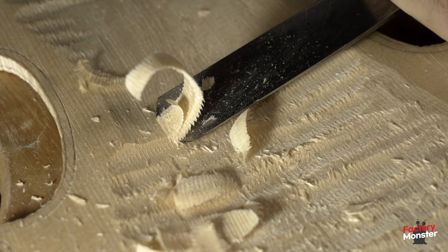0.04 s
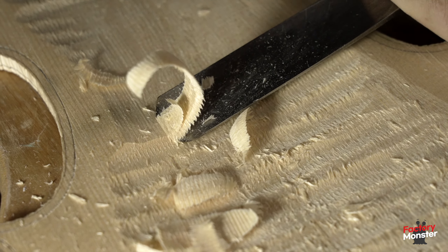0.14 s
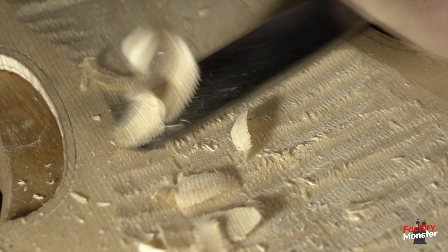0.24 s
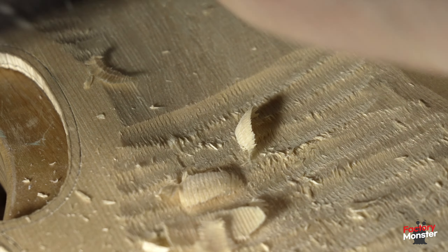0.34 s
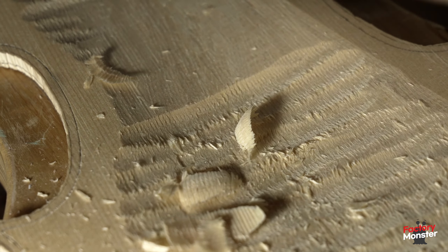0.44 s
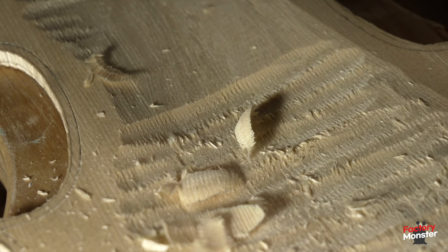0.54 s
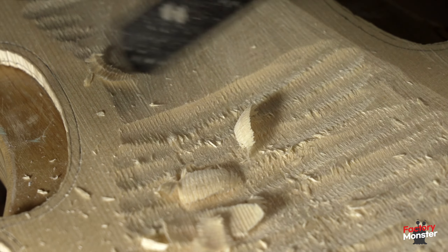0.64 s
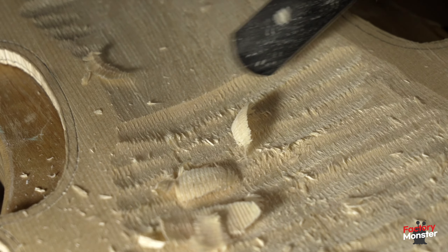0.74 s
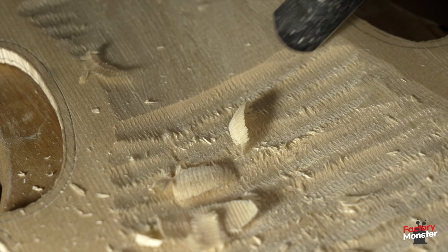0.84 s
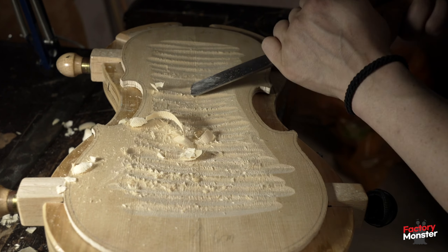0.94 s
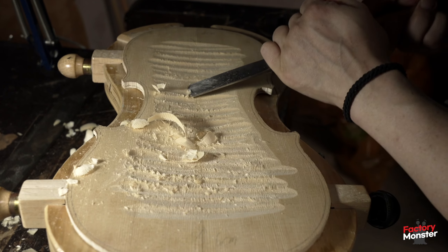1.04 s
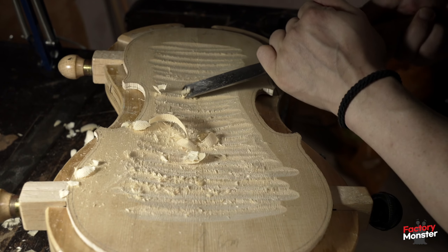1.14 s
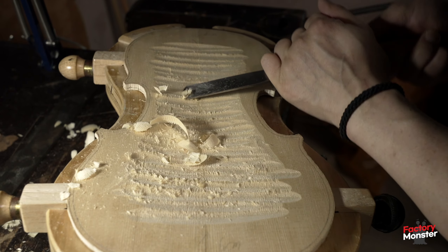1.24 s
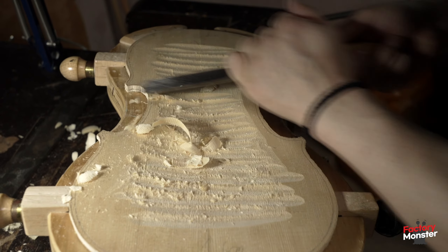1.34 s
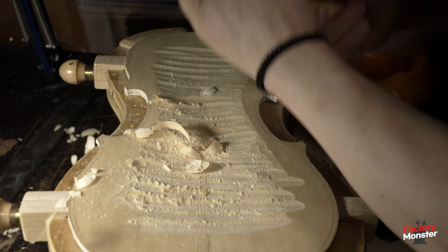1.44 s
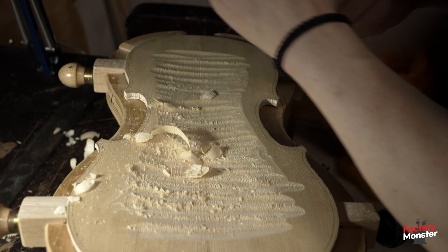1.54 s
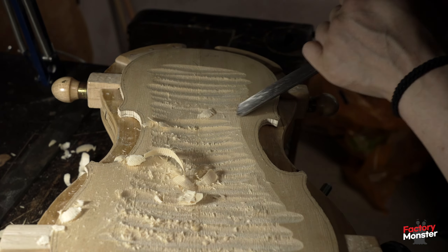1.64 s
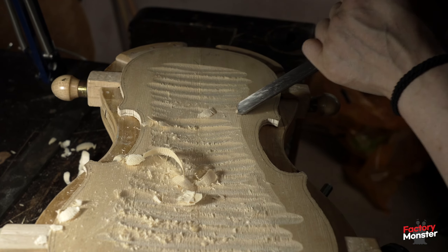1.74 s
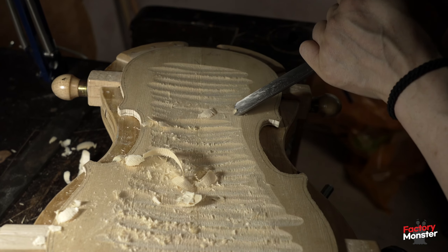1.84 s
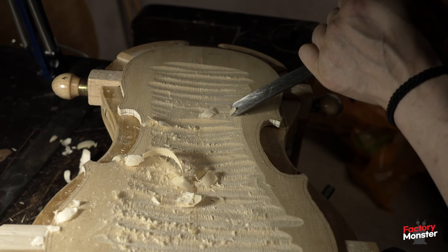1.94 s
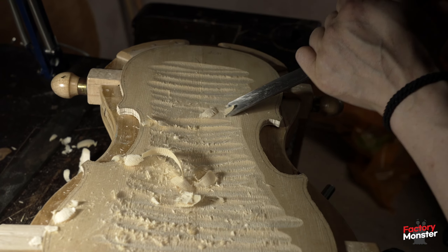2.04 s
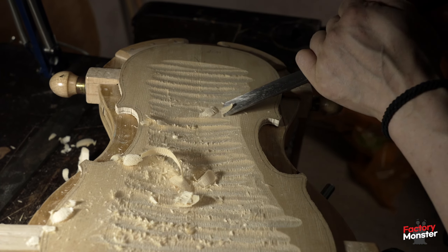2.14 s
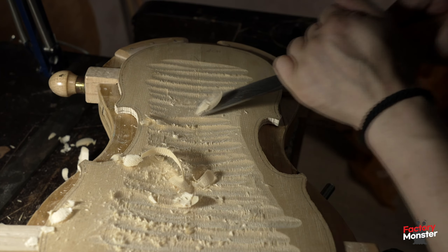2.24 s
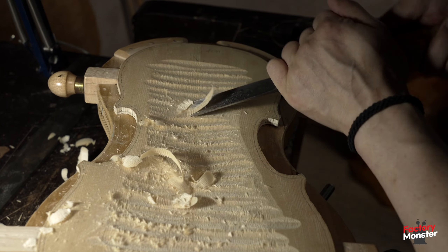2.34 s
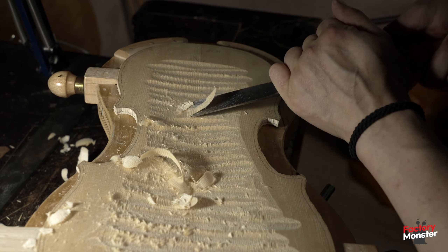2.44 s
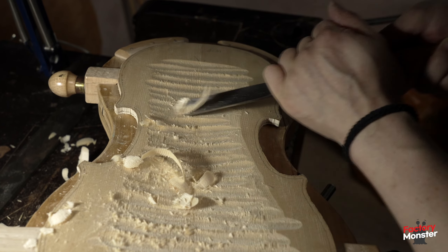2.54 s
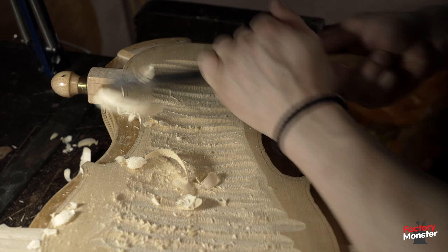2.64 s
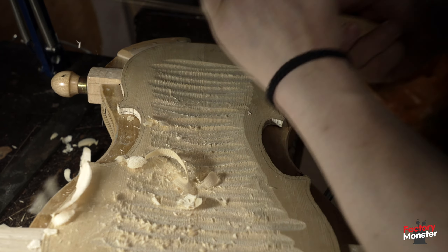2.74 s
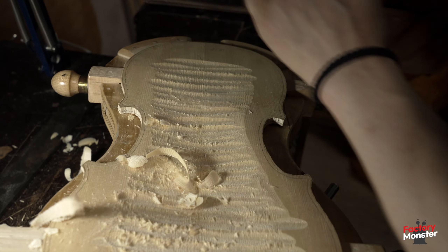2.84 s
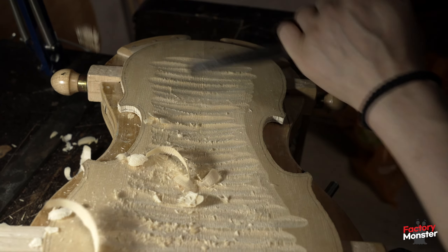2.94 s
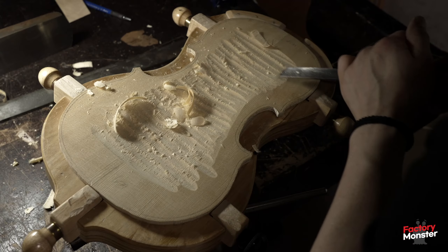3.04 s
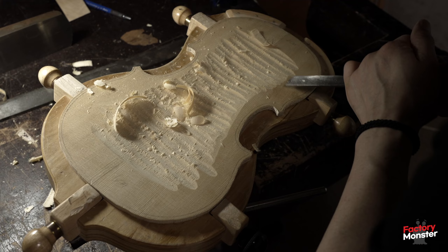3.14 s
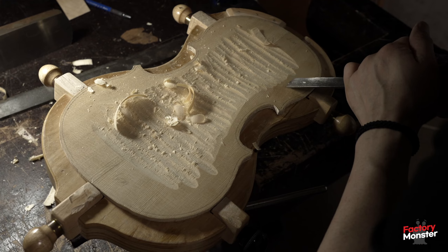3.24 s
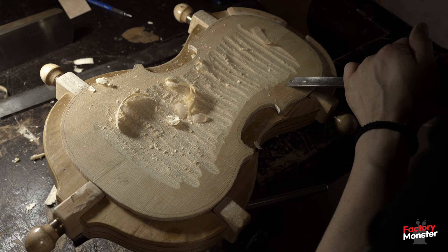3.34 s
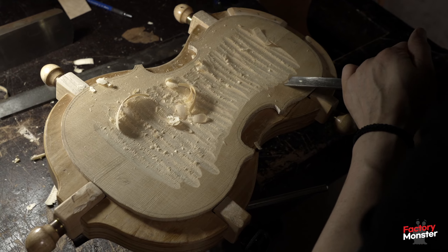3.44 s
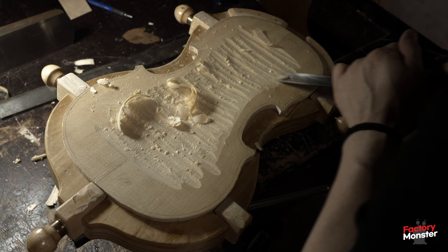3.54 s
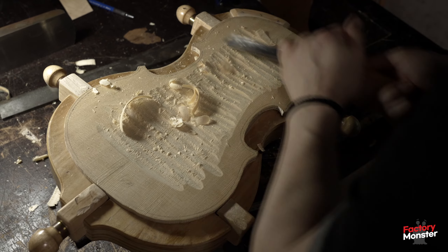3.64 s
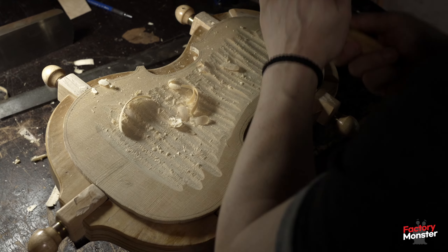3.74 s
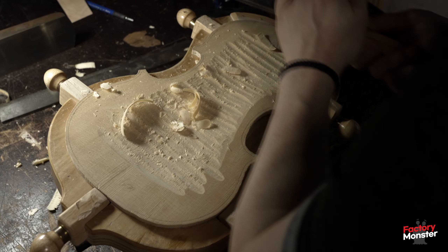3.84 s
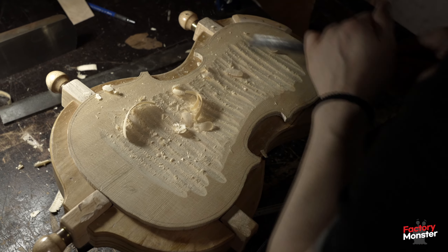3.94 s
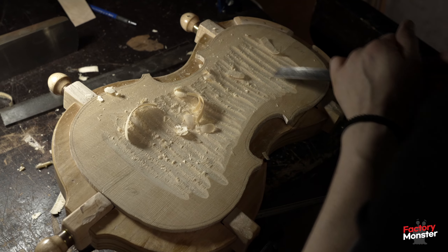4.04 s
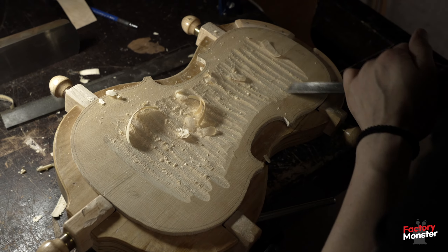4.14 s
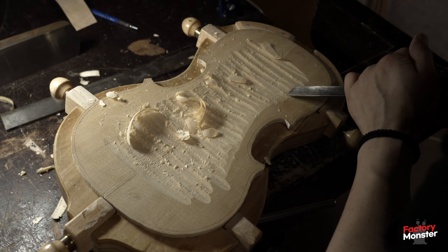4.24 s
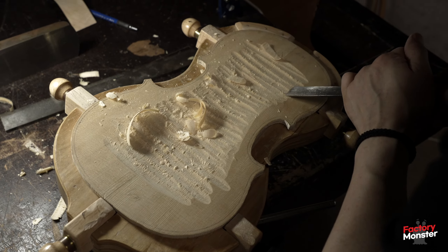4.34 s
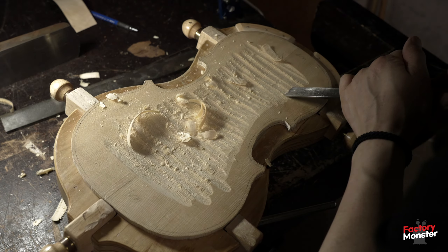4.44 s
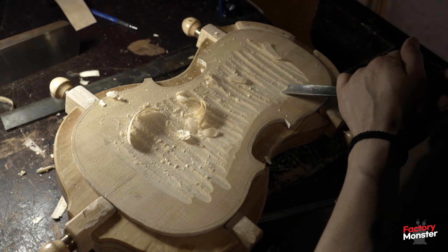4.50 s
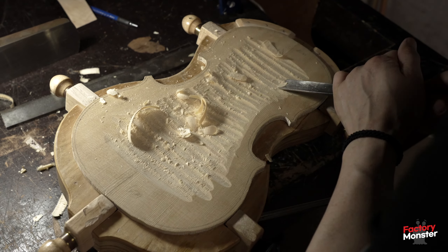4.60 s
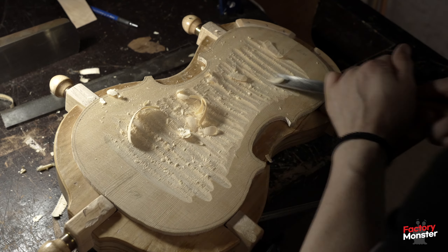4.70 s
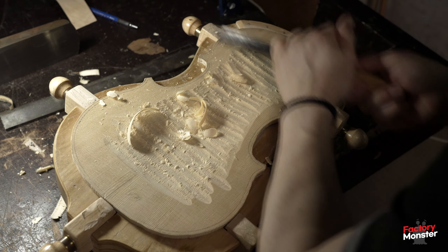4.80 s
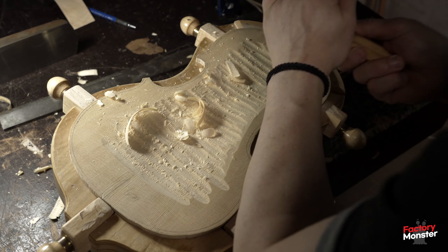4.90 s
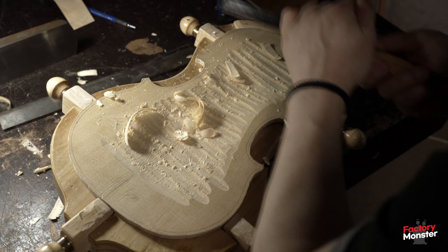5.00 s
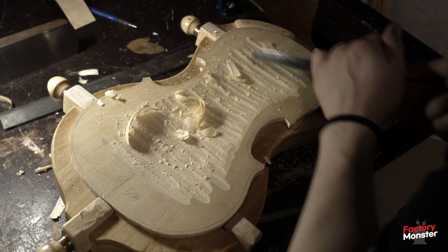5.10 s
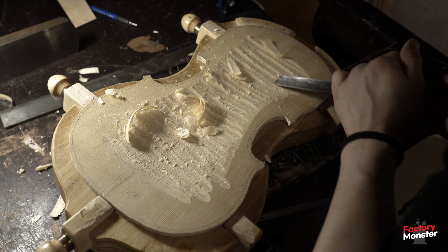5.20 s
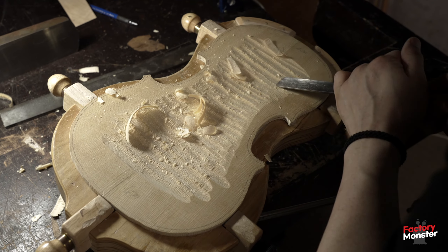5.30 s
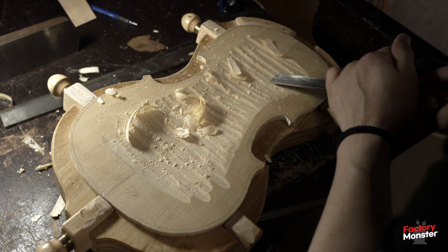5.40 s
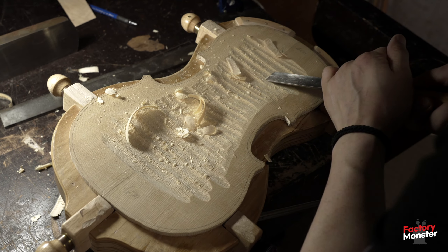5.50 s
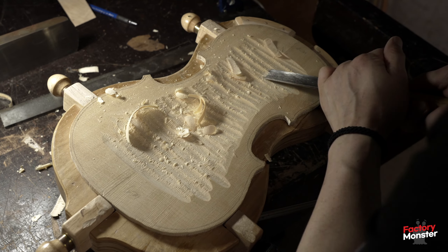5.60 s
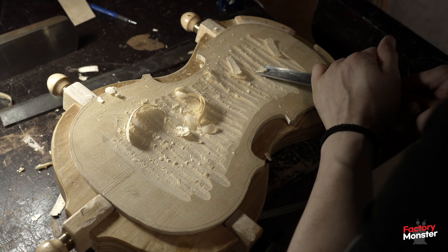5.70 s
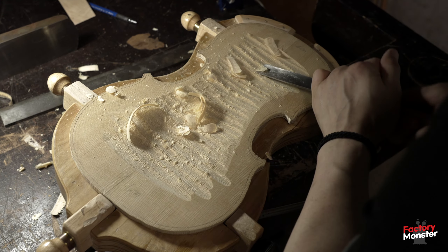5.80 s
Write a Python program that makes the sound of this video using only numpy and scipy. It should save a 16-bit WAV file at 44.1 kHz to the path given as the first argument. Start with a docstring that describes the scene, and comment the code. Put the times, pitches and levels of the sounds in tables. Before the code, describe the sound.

A hand gouge scrapes and cracks through hard wood up close, dense rasping strokes giving way to short separate cuts, in a small workshop.

```python
"""In a small workshop, a hand gouge carves a clamped maple plate on a bench, close to the microphone.
The edge sticks, cracks free and tears fibres: noise and short bursts excite resonances of plate, blade and fibres.
Steel knocks ring the same plate modes as decaying sines; the bench booms under the push as narrow-band noise.
Somebody further off taps metal, and faint squeaks glide in pitch; dense reflections of the room answer
over a quiet floor of rumble and air noise."""
import sys
import numpy as np
from scipy import signal
from scipy.fft import rfft, irfft
from scipy.io import wavfile
from scipy.ndimage import uniform_filter1d

SR = 44100
rng = np.random.default_rng(int(sys.argv[2]) if len(sys.argv) > 2 else 0)


def makeup_ratio(level_db):
    """Linear amplitude ratio for a level in decibels (20 dB per factor of ten)."""
    decades = np.asarray(level_db, float) / 20
    return 10 ** decades


def master(y):
    """Save y as 16-bit WAV."""
    cut = np.clip(np.atleast_2d(y).T, -1, 1)
    pcm = np.round(cut * 32767)  # scale
    wavfile.write(sys.argv[1], SR, pcm.astype(np.int16))


N = 258426
T = np.arange(N) / SR

# far machines, relative spectrum: pitch_hz, density_db (per Hz)
RUMBLE_SPECTRUM = [(13, -27), (22, -2.5), (39, 2.5), (65, -13), (97, -22), (188, -10), (258, -9.5),
                   (400, -28.5), (520, -54), (880, -120)]
# quiet air, relative spectrum: pitch_hz, density_db (per Hz)
AIR_SPECTRUM = [(220, -30), (380, -4), (511, -10), (677, -6.5), (743, -13.5), (842, -12.5), (1730, -19.5),
                (1870, -22), (2630, -23.5), (3540, -23.5), (5640, -34), (15800, -48.5)]
# course of the air noise, about which it wanders: time_s, level_db
AIR_LEVEL = [(0, -48), (.45, -46.5), (.8, -49.5), (1.0, -58), (3.0, -59.5), (5.86, -58.5)]
# reverberation in bands: centre_hz, decay_60db_s, level_db
ROOM_BANDS = [(277.8, 0.38, -22.5), (1074, 0.42, -28.5), (2940, 0.18, -14), (7000, 0.36, -21.5),
              (13000, 0.1, -21.5)]
# modes of the bench top: pitch_hz, width_hz
BENCH_MODES = [(77, 9.9), (150, 26)]
# the bench is leaned on: strongest_s, first_mode_db, second_mode_db
PUSHES = [(.01, -28, -46), (.14, -32, -38.5), (.3, -23, -43), (.41, -31, -53), (.82, -50, -34.5),
          (1.16, -28, -46), (1.33, -36.5, -52), (1.9, -46.5, -46), (2.1, -31, -41), (2.24, -41, -31),
          (2.43, -41, -46.5), (2.6, -36.5, -37), (3.23, -64, -47.5), (3.459, -45, -44), (3.57, -41, -33.5),
          (3.69, -47, -50), (4.21, -59, -46.5), (4.57, -41.5, -41.5), (4.78, -40, -39.5), (5.259, -64, -47),
          (5.47, -37.5, -39), (5.73, -31, -40.5), (5.83, -34, -48)]
# distant metal taps: start_s, peak_db, lower_modes_db (relative)
TAPS = [(0.523, -38.5, -15), (0.663, -32.5, -13.5), (1.596, -44.5, -7.5), (2.8747, -55, -12),
        (3.017, -54, -11.5), (3.8271, -48.5, -7), (3.9705, -39.5, -14.5), (4.109, -40.5, -20),
        (4.995, -46.5, -7), (5.1347, -39, -16.5), (5.264, -46, -18)]
# modes of the tapped metal: pitch_hz, level_db (relative), decay_60db_s
METAL_MODES = [(4270, 7.5, 0.028), (4350, -6, .1), (4600, 11, .04), (4840, -9, .07), (5040, -18.5, .03),
               (3600, 12.5, 0.11), (3930, 9.5, .14)]
# thin squeaks that glide up and down again: highest_s, half_length_s, top_hz, drop_hz, level_db
SQUEAKS = [(.42, .1, 15600, 4500, -72), (.43, .06, 14200, 900, -76), (4.147, .045, 10900, 800, -76),
           (4.147, .03, 10300, 300, -82), (4.147, .02, 13950, 250, -80)]
# modes of four regions, low plate, plate, blade and fibres: pitch_hz, width_hz, level_db (relative)
LOW_MODES = [(185, 25, -6), (255.2, 7.9, -7), (297, 26, -8.5), (325.6, 18, -3), (386, 58, -3)]
PLATE_MODES = [(632.5, 26, 3), (824.5, 11, -28), (922, 40, 11), (996, 10, 6), (1020, 98, 7), (1135, 28, -8),
               (1165, 71, 0), (1250, 110, -7.5), (1503, 14, -5), (1411, 29, -1), (1534, 97, 3.5),
               (1870, 220, -3.5), (2095, 220, -4.5)]
BLADE_MODES = [(2540, 200, -11), (3214, 72, -1.5), (3620, 300, 10.5), (3604, 480, 8.5), (3830, 57, -9),
               (3980, 79, -3.5), (4800, 160, -16)]
FIBRE_MODES = [(5483, 200, -2.5), (6044, 350, -1), (6594, 350, 6), (7900, 600, 3), (8280, 470, -1),
               (9510, 740, 1), (10480, 530, -2.5), (11520, 450, -3.5), (13200, 1500, -4),
               (15040, 990, -5.5)]
# broad hump under the modes, a row for each region: pitch_hz, width_hz, level_db (relative)
HUMPS = [(310, 530, -17), (1410, 580, -21), (3860, 950, -28), (9500, 9900, -12)]
# pitch above which each region no longer follows the edge: low_hz, plate_hz, blade_hz, fibre_hz
REACH_HZ = [900, 3200, 6500, 18000]
# steel set down on the plate:
# start_s, plate_peak_db, favoured_hz, low_db (relative), free_ringing_ms, pitch_spread (log ratio)
KNOCKS = [(0.152, -12.5, 944, -9, 12, 0.014), (0.807, -4.5, 1020, -14, 9, 0.037),
          (3.215, -15, 1168, -14, 8.5, 0.1), (3.346, -52, 1000, 21, 7.1, 0.1),
          (4.191, -14, 1160, -15.5, 11, 0.15), (4.328, -32, 1250, -17, 9, 0.11),
          (4.365, -49, 1000, 17, 8, 0.1), (5.248, -33, 1000, 2, 12.7, 0.07)]
# the edge cracks free: start_s, fibre_force_db, plate_db (relative)
CRACKS = [(.0816, -30, -2), (.1507, -33.5, 12), (.1915, -31, -14), (.2186, -20.5, 9), (.2336, -13, 15),
          (.5876, -35, -27), (.621, -51, -7), (.7273, -24.5, -24), (1.0087, -35, 10), (1.0276, -35.5, 14.5),
          (1.0544, -31, -2), (1.0904, -42, 12), (1.1144, -31, -2), (1.1376, -22, 2), (1.2293, -33.5, -2),
          (1.2644, -41, 7), (1.294, -26.5, -13), (1.3016, -24, 7), (1.475, -47, -21), (1.7581, -37, 2),
          (1.7898, -29, 18), (1.8627, -39, -1), (1.8881, -32.5, 14), (1.9071, -28, 12.5),
          (1.952, -27.5, 13), (1.9729, -30, 14), (2.0406, -21.5, 4), (2.059, -12.5, 11.5),
          (2.0686, -21, 6.5), (2.0774, -18, 8), (2.0946, -15.5, 8), (2.1632, -15, 4), (2.2001, -20, 7),
          (2.2171, -15.5, 2.5), (2.2314, -16, 8), (2.2374, -18, 0), (2.2434, -22, 0), (2.261, -18, 7),
          (2.3, -39, 2), (2.3966, -22.5, -9), (2.4194, -35, -20), (2.4748, -46, -20), (2.5535, -22.5, -5),
          (2.7921, -54, -5.5), (2.9442, -51, 14), (3.3877, -50, 11), (3.4481, -36.5, 7),
          (3.4585, -33.5, 10.5), (3.48, -35, 14), (3.4983, -26.5, 12), (3.5329, -34, 12.5),
          (3.5479, -26.5, 6), (4.0958, -54.5, 9), (4.4228, -50, 14), (4.4897, -34.5, 14.5),
          (4.5258, -31, 6), (4.5463, -38, 6.5), (4.5581, -17.5, 9), (4.584, -21, 4), (4.6084, -14, 8.5),
          (4.6577, -22, 1), (4.6798, -20, -13.5), (4.6922, -16.5, 4), (4.7117, -21.5, 1.5),
          (4.7887, -30.5, 19.5), (5.4302, -43, 18), (5.445, -30, 11), (5.5448, -47, 9), (5.7411, -22, -5),
          (5.7928, -14.5, -2.5), (5.8421, -42, 5)]
# the edge chatters over ripples of the grain:
# first_s, last_s, gap_s, first_db, last_db (before accents), plate_db (relative)
CHATTER = [(4.6286, 4.695, .021, -19, -23.5, 11), (5.5772, 5.64, .0185, -28.5, -32.5, 11.5),
           (5.6534, 5.735, .0197, -15.5, -23, 2.5)]
# the edge bites or slides: touch_s, swell_ms, hold_ms, full_force_db, let_go_db, fibre_db (relative)
BITES = [(0, 1.8, 66, -37.5, -58, -11), (0.17, 10, 13, -55, -53, -6), (0.201, 34, 55.6, -20, -11.5, -9.5),
         (0.592, 5, 48, -53, -58, -14), (0.797, 6.9, 145, -46, -47, -9.5),
         (0.997, 6.4, 159.6, -42, -30, -14), (1.225, 22, 38, -42, -52, -8.5),
         (1.289, 45.7, 18.3, -18.5, -25, -11), (1.667, 9.1, 19, -47.5, -50.5, -12),
         (1.738, 10, 54, -47.5, -35, -12), (1.855, 8.5, 47.6, -34.5, -36, -12),
         (1.95, 3.4, 27, -35, -31, -11), (2.034, 23, 46, -22.5, -27, -15), (2.17, 34, 98.6, -17, -20, -10),
         (2.388, 8.6, 39, -48, -60.5, -6), (2.53, 55.8, 44.6, -19.5, -16, -11),
         (3.28, 40, 49, -56.5, -51, -15), (3.371, 13, 10, -35, -37.5, -15.5),
         (3.439, 7, 130, -32, -37, -13.5), (3.537, 19.8, 36, -20, -16, -10.5),
         (3.616, 11, 42.7, -37, -36.5, -14), (4.0, 54, 250, -75, -74.5, -2),
         (4.284, 37, 4.2, -49, -47, -15.5), (4.358, 11, 28, -52, -59.5, -24),
         (4.407, 6.4, 24, -37, -36, -16.5), (4.458, 28.5, 18, -31.5, -36.5, -15),
         (4.507, 14.7, 167, -30, -26.5, -14.5), (4.698, 16, 54.5, -19.5, -18.5, -10),
         (4.773, 8.2, 29, -39, -39, -6), (5.242, 10, 53.7, -55.5, -61.5, -7),
         (5.355, 72.7, 58.8, -40, -31, -16), (5.529, 24, 185, -34, -24, -14.5),
         (5.79, 7.7, 32, -44, -49, -18), (5.829, 26.3, 9, -31, -24.5, -7.5)]
# course of the low plate modes' level, fullest at the start: time_s, level_db (relative)
LOW_SHARE = [(0, 2), (.35, -8.5), (.9, -3.5), (1.3, -13.5), (2, -14.5), (2.5, -22.5), (3.3, -11),
             (3.6, -15), (4.3, -4.5), (4.7, -19.5), (5.3, -5), (5.86, -19)]


def unit(x):
    """Normalisation to an rms value of 1."""
    return x / np.sqrt(np.mean(x ** 2))


def ring(x, hz, width):
    """A single resonance: second-order bandpass with gain 1 at its centre."""
    return signal.lfilter(*signal.iirpeak(hz, hz / width, fs=SR), x)


def walk(rate):
    """Slow random modulation: levels held for 1 / rate s and smoothed twice; spread near 1."""
    k = int(SR / rate)
    held = np.repeat(rng.standard_normal(N // k + 1), k)
    return 1.3 * uniform_filter1d(uniform_filter1d(held, k), k)[:N]


def add(out, s, sound):
    """Superposition of a sound that starts at time s."""
    i = int(s * SR)
    out[i:i + len(sound)] += sound[:N - i]


def coloured(spectrum):
    """Spectral shaping: white noise weighted in the frequency domain, rms 1."""
    hz, db = np.transpose(spectrum)
    f = np.maximum(np.arange(N // 2 + 1) * SR / N, 1)
    weight = makeup_ratio(np.interp(np.log(f), np.log(hz), db, -60, -60))
    return unit(irfft(rfft(rng.standard_normal(N)) * weight, N))


def floor():
    """Background noise: far machines and quiet air are shaped noises whose levels wander slowly."""
    rumble_db = -51.5 + 0.65 * walk(0.77)
    air_db = np.interp(T, *np.transpose(AIR_LEVEL)) + 1.6 * walk(6.18)
    return makeup_ratio(rumble_db) * coloured(RUMBLE_SPECTRUM) + makeup_ratio(air_db) * coloured(AIR_SPECTRUM)


def room(x, gap_s=.008):
    """Reverberation: convolution with noise bands, each decaying exponentially at its own rate."""
    t = T[:SR // 2]
    tail = 0
    for hz, t60, db in ROOM_BANDS:
        band = ring(rng.standard_normal(len(t)), hz, 1.36 * hz) * np.sqrt(SR / hz)
        tail = tail + makeup_ratio(db) * band * 1000 ** (-t / t60) / np.sqrt(t60 * SR / 4)
    return signal.fftconvolve(x, tail * (t > gap_s))[:N]


def bench():
    """Forced resonance: two modes of the bench top boom while it is pushed."""
    rise, falls, rests_db = 299.5, [107.5, 137.5], [-64, -63.5]  # slopes in dB/s
    out = 0
    s, *levels = np.transpose(PUSHES)
    coarse_t = T[::64]
    late = coarse_t - s[:, None]
    for (hz, width), db, fall, rest_db in zip(BENCH_MODES, levels, falls, rests_db):
        boom = unit(ring(ring(rng.standard_normal(N), hz, 2.0 * width), hz, width))
        # even out the slow swelling of narrow-band noise
        boom = boom / np.sqrt(0.07 + np.abs(uniform_filter1d(boom ** 2, int(.15 * SR))))
        push_db = (db[:, None] + np.minimum(rise * late, -fall * late)).max(axis=0)
        out = out + makeup_ratio(np.interp(T, coarse_t, np.maximum(push_db, rest_db))) * boom
    return out


def taps(smear_s=.008):
    """Free vibration of small steel: decaying sines, their attack smeared by distance."""
    out, t = np.zeros(N), T[:9000]
    for (s, db, lower_db), noise in zip(TAPS, rng.standard_normal((len(TAPS), 2000))):
        sound = 0
        for hz, mode_db, t60 in METAL_MODES:
            level = makeup_ratio(mode_db + (lower_db if hz < 4000 else 0))
            sound = sound + level * 1000 ** (-t / t60) * np.sin(2 * np.pi * hz * t)
        sound = signal.fftconvolve(sound, noise * np.exp(-T[:2000] / smear_s))
        add(out, s, makeup_ratio(db) * sound / np.abs(sound).max())
    return out


def squeaks():
    """Frequency modulation: faint sines glide along an arch of pitch while their level flutters."""
    out = np.zeros(N)
    for top, half, hz, drop_hz, db in SQUEAKS:
        u = np.linspace(-1, 1, int(2 * half * SR))
        phase = 2 * np.pi * np.cumsum(hz - drop_hz * u ** 2) / SR
        add(out, top - half, makeup_ratio(db) * np.sqrt(1 - u ** 4) * np.sin(phase))
    return out * makeup_ratio(4.0 * walk(60))


def struck(modes, favoured_hz, reach, damping, others_db=-21.0):
    """Modal superposition: decaying sines, strongest near the pitch that the spot favours; peak 1."""
    t = T[:6000]
    out = 0
    for hz, width, db in modes:
        favour = makeup_ratio(others_db) + np.exp(-(np.log(hz / favoured_hz) / reach) ** 2)
        decay = np.exp(-np.pi * damping * width * t)
        out = out + makeup_ratio(db) * favour * decay * np.sin(2 * np.pi * hz * t)
    return out / np.abs(out).max()


def knocks(rise_ms=0.78, swell_ms=2.9, left_db=-17.5, mute_ms=0.96):
    """Contact damping: the plate swells roundly and rings until the steel settles; low modes come late."""
    out, ms = np.zeros(N), 1000 * T[:6000]
    for s, db, hz, low_db, free_ms, reach in KNOCKS:
        muting = makeup_ratio(left_db / (1 + np.exp((free_ms - ms) / mute_ms)))
        rise = 1 - np.exp(-(ms / rise_ms) ** 2)
        plate = struck(PLATE_MODES + BLADE_MODES, hz, reach, 0.99) * rise * muting
        low = struck(LOW_MODES, 300, 1.2, 0.4) * (1 - np.exp(-ms / swell_ms))
        add(out, s, makeup_ratio(db) * (plate / np.abs(plate).max() + makeup_ratio(low_db) * low))
    return out


def crack_list(accent_db=-2.5):
    """Stick-slip events: single cracks, then evenly spaced runs of chatter with random accents."""
    out = list(CRACKS)
    for first, last, gap, first_db, last_db, plate_db in CHATTER:
        s = np.arange(first, last, gap)
        db = np.interp(s, [first, last], [first_db, last_db])
        db = db + accent_db * rng.standard_normal(16)[:len(s)]
        out += [(start, level, plate_db) for start, level in zip(s, db)]
    return out


def cracks(events, snap_db=3.5, low_db=-26.0, blade_db=-2.5, crumble_ms=2.26):
    """Impulsive excitation: a snap and a short noise crumble, with one force for each region."""
    force, t = np.zeros((4, N)), T[:2000]
    for (s, db, plate_db), noise in zip(events, rng.standard_normal((len(events), 2000))):
        burst = noise * np.exp(-1000 * t / crumble_ms) / 2
        burst[0] = makeup_ratio(snap_db)
        regions_db = (plate_db + low_db, plate_db, plate_db / 2 + blade_db, 0)
        for row, rel_db in zip(force, regions_db):
            add(row, s, makeup_ratio(db + rel_db) * burst)
    return force


def sticking(events, depth_db=-6.5, hold_ms=6.0, surge_db=4.0, surge_ms=6.1):
    """Stick-slip friction: the force dips as the edge hangs before each crack and surges after it."""
    hang, surge, ms = np.zeros(N), np.zeros(N), 1000 * T[:1500]
    for s, *_ in events:
        i = int(s * SR)
        dip = depth_db * np.exp(-(ms[::-1] / hold_ms) ** 2)
        hang[i - len(ms):i] = np.minimum(hang[i - len(ms):i], dip)
        surge[i:i + len(ms)] = surge_db * np.exp(-ms / surge_ms)[:N - i]
    return makeup_ratio(hang + surge)


def tearing(slip_db, slip_hz=170, jitter=.3, scatter_db=3.5, slip_ms=1.3, grit_db=2.5):
    """Random excitation: fibres part as gritty noise, in uneven slips some milliseconds apart."""
    chance = rng.standard_normal((N // 100, 2))
    at = np.cumsum(np.exp(jitter * chance[:, 0]) * SR / slip_hz).astype(int)
    slips = np.zeros(N)
    slips[at[at < N]] = makeup_ratio(scatter_db * chance[at < N, 1])
    slips = unit(signal.lfilter([1], [1, -np.exp(-1000 / (slip_ms * SR))], slips))
    grit = unit(rng.standard_normal(N) * makeup_ratio(grit_db * rng.exponential(size=N)))
    return grit * (1 + makeup_ratio(slip_db) * slips) / np.sqrt(1 + makeup_ratio(slip_db) + makeup_ratio(2 * slip_db))


def cut(edge_s=0.0055, tail_fibre_db=-7.5):
    """Cutting force on each region: every bite swells, holds, lets go and fades as the shaving slides off."""
    rise_db, drop_db, drop_ms, fade = 24, -14.5, 5.5, -220  # fade in dB/s
    blade_db, low_lag_ms = -8, 30  # blade relative to plate; the low modes follow the force late
    force, fibre = np.zeros(N), np.zeros(N)
    for touch, swell_ms, hold_ms, full_db, go_db, fibre_db in BITES:
        full, go = touch + swell_ms / 1000, touch + (swell_ms + hold_ms) / 1000
        t = T[int(touch * SR):int((go + .3) * SR)]
        after = np.maximum(t - go, 0)
        released = 1 - np.exp(-1000 * after / drop_ms)
        db = np.interp(t, [touch, full, go], [full_db - rise_db, full_db, go_db])
        db = db + drop_db * released + fade * after
        add(force, touch, makeup_ratio(db))
        add(fibre, touch, makeup_ratio(db + fibre_db + tail_fibre_db * released))
    keep = np.exp(-1000 / (low_lag_ms * SR))
    low = signal.lfilter([1 - keep], [1, -keep], force)
    low = low * makeup_ratio(np.interp(T, *np.transpose(LOW_SHARE)))
    gain = np.array([low, force, makeup_ratio(blade_db) * force, fibre])
    return tearing(slip_db=-7.5) * uniform_filter1d(gain, int(edge_s * SR))


def body(force, modes, hump, shift_db=2.2):
    """Modal filtering at about constant noise power; the moving edge shifts the balance of the modes."""
    modes = [hump] + list(modes)
    power = sum(makeup_ratio(2 * db) * width for hz, width, db in modes) * np.pi / SR
    out = sum(makeup_ratio(db + shift_db * walk(5.233)) * ring(force, hz, width)
              for hz, width, db in modes)
    return out / np.sqrt(power)


def gouge():
    """Source and resonator: cutting force and cracks drive the modes of the four regions."""
    events = crack_list()
    forces = cut() * sticking(events) + cracks(events)
    regions = (LOW_MODES, PLATE_MODES, BLADE_MODES, FIBRE_MODES)
    out = 0
    for force, modes, hump, reach_hz in zip(forces, regions, HUMPS, REACH_HZ):
        # above its modes the mass of each region no longer follows the edge
        force = signal.lfilter(*signal.butter(2, reach_hz, fs=SR), force)
        out = out + body(force, modes, hump)
    return out


def scene():
    """Superposition: gouge, knocks, taps and squeaks in the room, over bench and floor."""
    in_room = gouge() + knocks() + taps() + squeaks()
    return (in_room + room(in_room) + bench() + floor())[None]


def low_pass(x):
    """Removes everything above the highest recorded frequency."""
    return signal.sosfilt(signal.butter(12, 17010, fs=SR, output="sos"), x)


def record(dry):
    """Saturation and band limiting: the loudest peaks are rounded, the deepest bass and the top cut."""
    x = np.tanh(1.16 * dry) / 1.315
    x = signal.sosfilt(signal.butter(2, 30, "high", fs=SR, output="sos"), x)
    x = signal.sosfilt(signal.ellip(12, .2, 60, 15690, fs=SR, output="sos"), x)
    return low_pass(x)


dry = scene()
out = record(dry)
master(out)
```